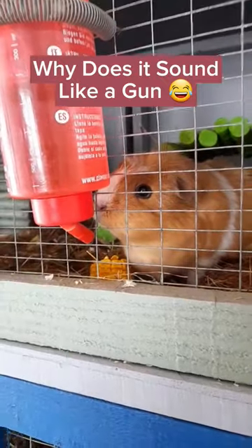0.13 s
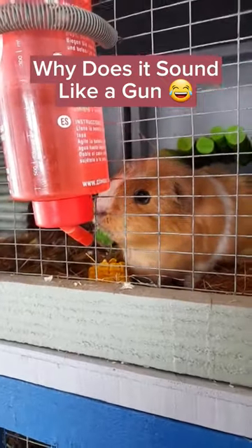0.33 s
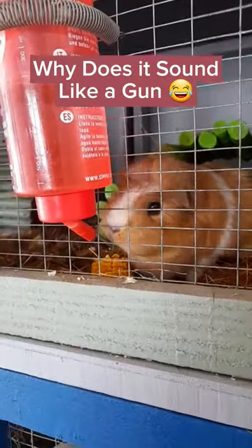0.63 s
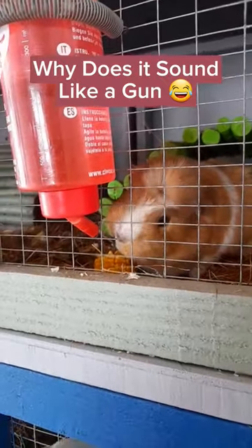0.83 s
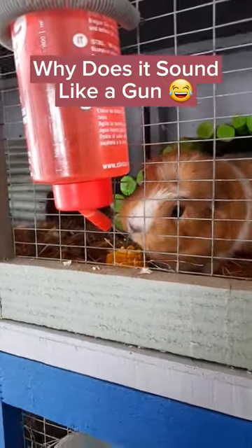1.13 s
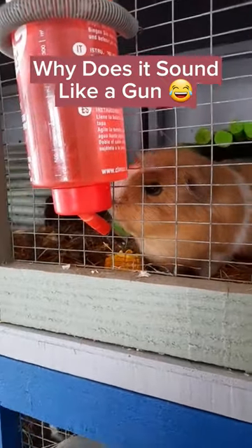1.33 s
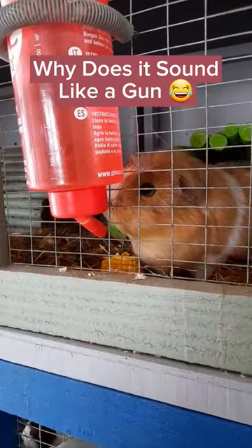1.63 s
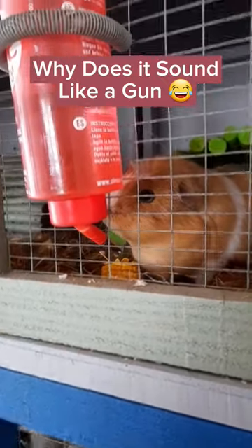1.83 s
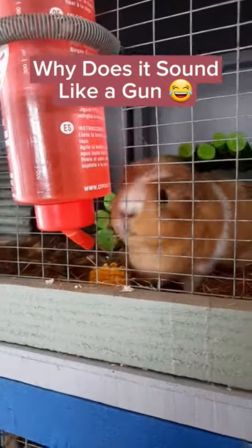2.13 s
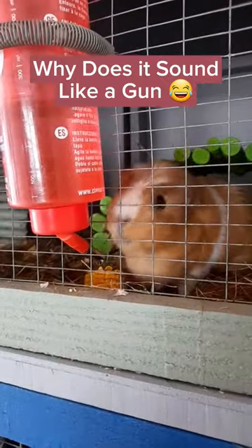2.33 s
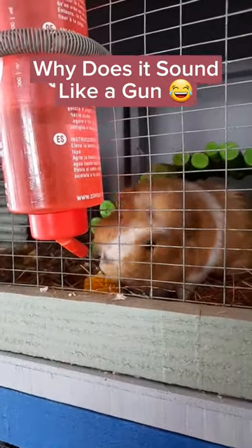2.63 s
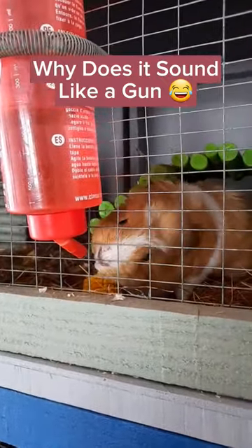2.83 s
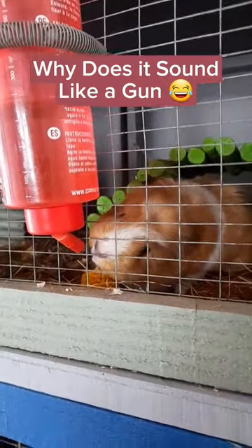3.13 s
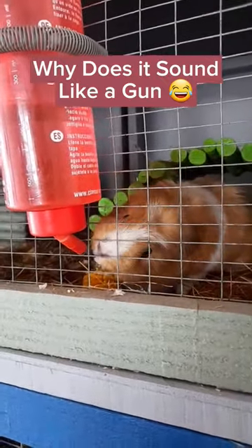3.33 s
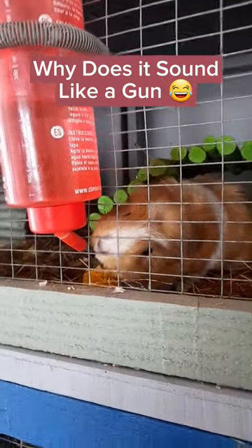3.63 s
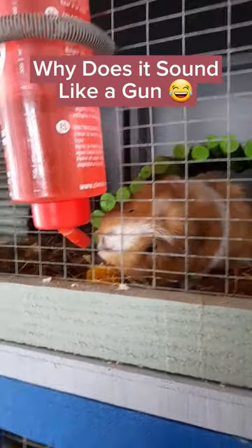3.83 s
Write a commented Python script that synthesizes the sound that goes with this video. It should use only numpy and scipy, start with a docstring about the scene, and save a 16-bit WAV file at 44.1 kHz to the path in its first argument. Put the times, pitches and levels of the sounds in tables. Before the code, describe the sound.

Metal water bottle spout clicks dominate the end. From 0 to 2.8 s there is only low hiss, faint rustle, soft muffled bedding pats, dull handling bumps and two tiny high ticks before 0.3 s. At about 2.9 s hard, bright ball clicks and gritty tooth scrapes begin, clustering near 3.1, 3.2, 3.4, 3.65 and 3.95 s, with short bottle knocks, cage rattle, stronger handling rumble and small-room echo.

```python
"""The metal spout of a water bottle, worked by a guinea pig in a wire cage, close to a hand-held phone.
Bursts of noise excite decaying modes: the ball clicks in quick clusters, teeth scrape in short bursts,
and bottle, tube and cage wire ring briefly, with a small room around them. Before that the animal shuffles
in its bedding: soft puffs of filtered noise over a faint rustle, with two faint, very short high ticks.
Underneath lie noise bands for room hiss and handling rumble, and low tones for bumps of the hand."""
import sys
import numpy as np
from scipy import signal
from scipy.fft import rfft, irfft
from scipy.io import wavfile
from scipy.ndimage import uniform_filter1d, map_coordinates

SR = 44100
rng = np.random.default_rng(int(sys.argv[2]) if len(sys.argv) > 2 else 0)


def generate_wav(sig):
    """Save sig (samples, or channels by samples) to the path in sys.argv[1] as 16-bit PCM at SR."""
    pcm = np.round(np.clip(np.atleast_2d(sig).T, -1, 1) * 32767).astype(np.int16)
    wavfile.write(sys.argv[1], SR, pcm)


N = 176400
T = np.arange(N) / SR
LN_60_DB = np.log(1000)  # a mode falls by this exponent in its t60


def undb(db):
    """Decibels to amplitude."""
    return 10 ** (np.asarray(db) / 20)


def unit(x):
    """Scale to an RMS of 1."""
    return x / np.sqrt(np.mean(x ** 2))


def match_energy(x, energy):
    """Give each channel the stated energy."""
    return x * np.sqrt(energy / np.sum(x ** 2, axis=1, keepdims=True))


def band(x, lo_hz, hi_hz):
    """Band-pass filter."""
    return signal.sosfilt(signal.butter(2, [lo_hz, hi_hz], "bandpass", fs=SR, output="sos"), x)


def swell(peak_s, rise_s, fall_s):
    """Bell-shaped rise to the peak, exponential fall."""
    d = T - peak_s
    return np.where(d < 0, np.exp(-(d / rise_s) ** 2), np.exp(-np.abs(d) / fall_s))


def drift(per_s):
    """Slow chance: random steps smoothed into a wandering curve around 0."""
    hold = int(SR / per_s)
    steps = np.repeat(rng.standard_normal(N // hold + 1), hold)
    return uniform_filter1d(steps, hold)[:N]


def pan(left_minus_right_db):
    """Stereo gains, half of the difference on each side."""
    return undb(np.array([[.5], [-.5]]) * left_minus_right_db)


def pair(like, count=N):
    """Left and right noise that are partly alike (0 separate, 1 identical)."""
    a, b = rng.standard_normal((2, count))
    like = np.clip(like, 0, 1)
    return np.array([a, like * a + np.sqrt(1 - like ** 2) * b])


def pair_spectra(like):
    """Spectra of left and right noise, alike by a share per frequency."""
    a, b = rfft(rng.standard_normal((2, N)))
    return np.array([a, like * a + np.sqrt(np.clip(1 - like ** 2, 0, 1)) * b])


def ring(x, hz, t60):
    """One decaying mode driven by x: a complex one-pole resonator."""
    pole = np.exp(2j * np.pi * hz / SR - LN_60_DB / (t60 * SR))
    return signal.lfilter([1], [1, -pole], x).imag


# hiss colour: f/Hz, relative density/dB
HISS_COLOUR = [(120, -27), (200, -3.5), (491, -5), (579, -11.5), (968, -4.5), (1140, -16.5), (1980, -14),
               (6640, -14), (7680, -19.5), (9580, -13.5), (13800, -12.5), (14900, -10), (16000, -50)]
# hiss stereo balance: f/Hz, left minus right/dB
HISS_PAN = [(60, -3.5), (110, -12), (200, -10.5), (380, -4), (700, 0), (1290, 0), (2380, -1), (4400, -1),
            (8120, -1), (15000, 2)]
# slight swelling of the hiss: t/s, level/dB (only its departure from the mean counts)
HISS_SWELL = [(0.0, -70), (0.04, -70), (0.12, -73.5), (0.24, -68.5), (0.39, -73.5), (1.31, -71),
              (1.42, -66), (1.53, -72.5), (2.26, -70.5), (2.35, -71.5), (2.75, -68.5)]
HISS_DB, HISS_LOW_CUT_HZ = -61, 180
HISS_LIKENESS, HISS_ALIKE_HZ = 0.067, 452  # least likeness of the sides, and where likeness falls halfway to it


def hiss():
    """Room and microphone hiss: coloured noise, more alike in both sides at low frequencies."""
    hz = np.arange(N // 2 + 1) * SR / N

    def curve(table):
        f, db = np.array(table).T
        return np.interp(np.log(hz + 1), np.log(f + 1), db)

    like = HISS_LIKENESS + (1 - HISS_LIKENESS) / (1 + ((hz + 1) / HISS_ALIKE_HZ) ** 2)
    colour = undb(curve(HISS_COLOUR)) * pan(curve(HISS_PAN)) * (hz + 1 > HISS_LOW_CUT_HZ)
    noise = irfft(pair_spectra(like) * colour, N)
    t, db = np.array(HISS_SWELL).T
    return undb(HISS_DB + np.interp(T, t, db - db.mean())) * unit(noise)


# handling rumble before panning: t/s, deep level/dB, upper level/dB
RUMBLE = [(0.0, -48, -59), (0.05, -66, -63.5), (0.38, -59, -66), (0.47, -61, -52.5), (0.59, -53, -57.5),
          (0.67, -71, -64), (1.01, -57.5, -64.5), (1.05, -54.5, -63), (1.68, -71, -62.5),
          (1.73, -56, -61.5), (2.17, -64.5, -66), (2.61, -60, -56.5), (2.782, -58.5, -65.5),
          (2.92, -45, -59), (3.01, -57, -52), (3.04, -48, -46), (3.11, -46, -43.5), (3.23, -59, -46.5),
          (3.35, -41.5, -57.5), (3.52, -62, -50), (3.58, -48, -58.5), (3.7, -62, -60), (3.74, -54, -51),
          (3.84, -51.5, -58), (4.0, -50, -49)]


def rumble():
    """The hand on the phone: two low noise bands, the deep one nearly the same in both ports."""
    t, deep_db, upper_db = np.array(RUMBLE).T
    deep = unit(band(band(pair(0.98), 40.5, 107), 33.3, 67.6))
    upper = unit(band(pair(0.45), 50.0, 201.0))
    return pan(-4.5) * (undb(np.interp(T, t, deep_db)) * deep + undb(np.interp(T, t, upper_db)) * upper)


# dull bumps of the hand on the phone: t/s, level/dB before panning, f/Hz, fall/s
BUMPS = [(0.454, -45.5, 190, 0.036), (0.511, -44, 56, 0.034), (0.572, -43.5, 54.3, 0.03),
         (1.24, -43.5, 50.3, 0.019), (3.037, -29.5, 102, 0.017), (3.083, -33, 65, 0.014),
         (3.114, -29, 61.6, 0.017), (3.24, -38.5, 109, 0.032), (3.329, -63, 55, 0.064),
         (3.899, -38, 111, .04)]
BUMP_RISE_S = 0.0063


def bumps():
    """Short low sine tones that swell and die."""
    out = 0
    for s, db, hz, fall_s in BUMPS:
        shape = swell(s + BUMP_RISE_S, BUMP_RISE_S, fall_s)
        out = out + undb(db) * shape * np.sin(2 * np.pi * hz * (T - s))
    return pan(-1.7) * out


BEDDING_PAN_DB = -7.5  # left minus right
RUSTLE_DB, RUSTLE_SWAY_DB, RUSTLE_PER_S = -78.5, 5, 30


def rustle():
    """A faint lumpy rustle of bedding: neighbouring noise bands that come and go at random."""
    out = 0
    for hz in (443, 636, 808, 1050, 1340):
        sway = undb(RUSTLE_DB + RUSTLE_SWAY_DB * drift(RUSTLE_PER_S))
        out = out + sway * unit(band(pair(0.46), hz / 1.2, hz * 1.205))
    return pan(BEDDING_PAN_DB) * out


# soft shuffles in the bedding: t/s, relative level/dB, f/Hz
SHUFFLES = [(0.245, -50.5, 816), (0.229, -49.5, 970), (0.434, -57, 345), (0.473, -53.5, 668),
            (0.51, -52, 472), (0.569, -53, 420), (0.588, -53, 1020), (0.671, -50.5, 950),
            (0.798, -59.5, 392), (0.844, -57, 1010), (1.389, -67, 430), (1.415, -63, 487),
            (1.609, -53, 936), (1.728, -53, 482), (1.907, -56, 477), (1.931, -51, 442), (2.152, -52, 444),
            (2.171, -48.5, 1040), (2.203, -56.5, 1190), (2.395, -52, 450), (2.419, -49, 458),
            (2.513, -59, 790), (2.6, -48, 427), (2.685, -42.5, 503), (2.705, -48, 396), (2.624, -57, 945),
            (0.3182, -58, 1760), (0.511, -53.5, 1280), (0.8196, -56, 1680), (1.2022, -55, 1670),
            (1.2725, -55.5, 1200), (1.4094, -62, 1250), (1.7554, -57, 1410), (1.94, -54, 1720),
            (2.028, -55.5, 1440), (2.437, -50, 1270), (2.5122, -53.5, 1245), (2.7496, -56, 1284)]
SHUFFLE_RISE_S, SHUFFLE_FALL_S, SHUFFLE_DB = 0.0033, 0.021, -8
SHUFFLE_PARTS = ((0.065, 0), (1, -7))  # pitched puff and broad rustle: band spread as a share of f, level/dB


def shuffles():
    """Short muffled pats, each a puff of noise around its own pitch with a broader rustle."""
    out = 0
    for s, db, hz in SHUFFLES:
        shape = swell(s + SHUFFLE_RISE_S, SHUFFLE_RISE_S, SHUFFLE_FALL_S)
        for spread, part_db in SHUFFLE_PARTS:
            puff = shape * band(pair(0.53), hz / (1 + spread), hz * (1 + spread))
            out = out + undb(db + SHUFFLE_DB + part_db) * match_energy(puff, np.sum(shape ** 2))
    return pan(BEDDING_PAN_DB) * out


# faint, very short high ticks: t/s, level/dB before panning, f/Hz, left minus right/dB
PIPS = [(0.0273, -45, 9960, 16), (0.2848, -52, 11500, 7)]
PIP_FALL_S = .0012


def pips():
    """Faint, very short high ticks: sines that start at once and die fast."""
    out = 0
    for s, db, hz, pan_db in PIPS:
        decay = (T > s) * np.exp(-np.abs(T - s) / PIP_FALL_S)
        out = out + pan(pan_db) * undb(db) * decay * np.sin(2 * np.pi * hz * (T - s))
    return out


ROOM_T60_S, ROOM_DB, ROOM_DULL_HZ = 0.19, -7.5, 7850


def room(x):
    """A small room: a dull, decaying cloud of echoes, different in each port."""
    t = T[:SR // 2]
    tail = rng.standard_normal((2, len(t))) * np.exp(-LN_60_DB * t / ROOM_T60_S)
    tail = signal.lfilter(*signal.butter(1, ROOM_DULL_HZ, fs=SR), tail)
    tail = tail / np.sqrt(np.sum(tail ** 2) / 2)
    return undb(ROOM_DB) * signal.fftconvolve(x, tail, axes=1)[:, :N]


# scrapes of teeth on the spout: peak t/s, rise/s, fall/s, relative level/dB,
# low knock against that level/dB, treble tick against that level/dB
SCRAPES = [(2.8, 0.012, 0.031, -49, -48, -12), (2.848, 0.011, 0.087, -49, -41, -12),
           (2.908, 0.019, 0.02, -32, -6, -9.5), (3.017, 0.019, 0.1, -45.5, -8.5, -10),
           (3.149, 0.016, 0.012, -52, -8, -5), (3.183, 0.011, 0.016, -28.5, 0.5, -13),
           (3.282, 0.059, 0.068, -44.5, 2.5, -17), (3.438, 0.012, 0.022, -27.5, -3.5, -9),
           (3.499, 0.0097, 0.022, -56.5, 11.5, -33), (3.544, 0.014, 0.048, -42.5, 0, -16),
           (3.699, 0.012, 0.024, -26, -6.5, -8), (3.792, 0.012, 0.069, -40.5, 0.5, -18.5),
           (3.953, 0.022, 0.035, -31.5, -6, -13.5)]
SLIPS_PER_S, SLIP_SCATTER_DB = 2500, 4
SLIP_GAPS_DB, SLIP_GAPS_PER_S = 3.5, 180  # slow unevenness of the slips
COLOUR_DRIFT_DB, COLOUR_DRIFT_PER_S = 2.5, 60  # each mode's drive wanders
SCRAPE_COLOUR_DB, SCRAPE_DETUNE, SCRAPE_DAMP = 2, .03, .3  # damp: share of a mode's free t60
SCRAPE_LEAD, SCRAPE_SPAN = 4096, 16384  # samples before the peak, samples in all


def scrapes(modes, column, like, late_s):
    """Uneven slips ring all modes at once; each scrape grips elsewhere, so tuning and strengths change."""
    out = np.zeros((2, N + SCRAPE_SPAN))
    size_db = SLIP_SCATTER_DB * rng.standard_normal(N) + SLIP_GAPS_DB * drift(SLIP_GAPS_PER_S)
    slips = (rng.random(N) < SLIPS_PER_S / SR) * undb(size_db)
    grains = unit(slips * pair(like))
    sways = [undb(COLOUR_DRIFT_DB * drift(COLOUR_DRIFT_PER_S)) for _ in modes]
    for row in SCRAPES:
        peak_s, rise_s, fall_s, db = row[:4]
        part_db = row[3 + column] if column else 0
        push = undb(db + part_db) * swell(peak_s + late_s, rise_s, fall_s)
        at = int(peak_s * SR) - SCRAPE_LEAD
        span = slice(at, at + SCRAPE_SPAN)
        force = match_energy((push * grains)[:, span], np.sum(push ** 2))
        end = at + force.shape[1]
        chance = rng.standard_normal((len(modes), 3))
        for (hz, mode_db, t60), sway, (colour, detune, sign) in zip(modes, sways, chance):
            damped_t60 = t60 * SCRAPE_DAMP
            even = np.sqrt(4 * LN_60_DB / (damped_t60 * SR))  # evens out long and short rings
            size = np.sign(sign) * undb(mode_db + SCRAPE_COLOUR_DB * colour) * even
            out[:, at:end] += size * ring(force * sway[span], hz * (1 + SCRAPE_DETUNE * detune), damped_t60)
    return out[:, :N]


# low modes of the cage: f/Hz, relative level/dB, free t60/s (SCRAPE_DAMP shortens it)
CAGE = [(232, -14, 0.047), (316, -3.5, 0.11), (377, -1.5, 0.12), (472, 0.5, 0.11), (590, -7, 0.013)]
CAGE_DB, CAGE_LATE_S, CAGE_PAN_DB = -10.5, 0.024, 1


def cage():
    """The shaken cage rumbles a little after each scrape."""
    return undb(CAGE_DB) * pan(CAGE_PAN_DB) * scrapes(CAGE, column=1, like=1.0, late_s=CAGE_LATE_S)


# sharp clicks of the ball and teeth: t/s, relative level/dB,
# low knock against that level/dB, treble tick against that level/dB
CLICKS = [(2.8954, -24.5, -27, 1.5), (2.9085, -24, -37, 2.5), (2.9144, -34, 3, 9),
          (3.0727, -14.5, -23, -27), (3.077, -31.5, -13, 9.5), (3.09, -36.5, -4, 12.5),
          (3.1138, -24.5, -11.5, 1.5), (3.1785, -18.5, -29, -4), (3.1865, -29, 5, 15.5),
          (3.1979, -19.5, -5, 3), (3.2085, -36.5, 9, 0), (3.3523, -14.5, -11, -25),
          (3.357, -13, -10.5, -12.5), (3.361, -35, -9, 5), (3.3942, -21, -4, -1), (3.4376, -20, -23, 1),
          (3.4424, -27, -20, 1), (3.4479, -20.5, -2.5, 3), (3.624, -14, -25, -30),
          (3.6255, -14.5, -10, -17), (3.6287, -19, -7.5, -6), (3.6464, -15.5, -8.5, 3.5),
          (3.7087, -21.5, -8, 2), (3.7113, -18, -7.5, -13), (3.7275, -23.5, 6, -14), (3.7732, -50, 7, -20),
          (3.896, -23.5, -2, 1), (3.9468, -26, -26, 1), (3.9558, -21.5, -6, 3.5), (3.9773, -26.5, 6, -3)]
HIT_SCATTER_DB, DETUNE, CLICK_LOW_HZ = 3.5, .02, 523
RING_DAMP, CRACK_DAMP, CRACK_DB = .33, .12, -3  # shares of a mode's free t60; the crack dies sooner
CONTACT_S, CHATTER_TAIL_S, CHATTER_TAIL_DB, CHATTER_SCATTER_DB = 0.00038, 0.005, -11.5, 3.5


def clicks(modes, column, like):
    """Every click is a brief chatter that rings the modes with its own strengths and tuning."""
    out = np.zeros((2, N))
    t = T[:4096]
    hz, db, t60 = np.array(modes).T[:, :, None]
    energy = np.sum(undb(db) ** 2 * t60) * SR / (4 * LN_60_DB)
    decay = np.exp(-LN_60_DB * t / (t60 * RING_DAMP))
    decay = decay + undb(CRACK_DB) * np.exp(-LN_60_DB * t / (t60 * CRACK_DAMP))
    contact = np.exp(-t / CONTACT_S) + undb(CHATTER_TAIL_DB) * np.exp(-t / CHATTER_TAIL_S)
    for row in CLICKS:
        detune, shared, left, right, sign = rng.standard_normal((5, len(modes), 1))
        rings = np.sign(sign) * np.sin(2 * np.pi * hz * (1 + DETUNE * detune) * t) * decay
        sides = []
        for own in (left, right):
            scatter_db = HIT_SCATTER_DB * (like * shared + (1 - like) * own)
            sides.append(np.sum(undb(db + scatter_db) * rings, axis=0))
        roughness = undb(CHATTER_SCATTER_DB * rng.standard_normal(len(t)))
        chatter = pair(like, count=len(t)) * roughness * contact
        blow = signal.fftconvolve(np.array(sides), chatter, axes=1)[:, :len(t)]
        blow = match_energy(blow, energy)
        part_db = row[1 + column] if column else 0
        at = int(row[0] * SR)
        out[:, at:at + len(t)] += undb(row[1] + part_db) * blow[:, :min(len(t), N - at)]
    return signal.sosfilt(signal.butter(3, CLICK_LOW_HZ, "highpass", fs=SR, output="sos"), out)


def strike(modes, column, like):
    """Clicks and scrapes on one set of modes (column 0 plain level, 1 adds the knock's, 2 the tick's)."""
    return clicks(modes, column, like) + scrapes(modes, column, like, late_s=0)


# modes of bottle, tube and ball: f/Hz, relative level/dB, free t60/s (clicks and scrapes shorten it)
KNOCK = [(680, -20, 0.076), (740, -3.5, 0.071), (815, -1.5, 0.033), (874, -2.5, 0.017), (1140, -2.5, 0.008)]
TUBE = [(1350, -22, 0.013), (1790, -1.5, 0.039), (2070, -9, 0.015), (2463, 2, 0.02), (2940, -16, 0.009),
        (3195, -3.5, 0.063), (3520, -6, 0.063), (3824, -7, 0.033), (4194, -4, 0.049), (4484, -4, 0.044),
        (5000, -6, 0.022), (5750, -10, 0.031), (6360, -14, 0.041), (7070, -13.5, 0.029)]
TICK = [(8000, -12, 0.0051), (9400, -20, 0.0027), (10150, -6.5, 0.003), (11750, -8.5, 0.039),
        (12400, -7, 0.0023), (13070, -5.5, 0.0074), (13400, -10.5, 0.01), (14200, -8, 0.0046),
        (15000, -12, 0.0018)]
KNOCK_DB, KNOCK_PAN_DB, KNOCK_LIKE = -2, 0, 0.78
TUBE_DB, TUBE_PAN_DB, TUBE_LIKE = -7, -0.5, 0.55
TICK_DB, TICK_PAN_DB, TICK_LIKE = 4, 6.5, 0.32
PORT_LAG_S = 0.000295


def spout():
    """Low knock of the bottle, ring of the tube, bright tick of the ball; the right port hears them later."""
    knock = undb(KNOCK_DB) * pan(KNOCK_PAN_DB) * strike(KNOCK, column=1, like=KNOCK_LIKE)
    tube = undb(TUBE_DB) * pan(TUBE_PAN_DB) * strike(TUBE, column=0, like=TUBE_LIKE)
    tick = undb(TICK_DB) * pan(TICK_PAN_DB) * strike(TICK, column=2, like=TICK_LIKE)
    left, right = knock + tube + tick
    return np.array([left, map_coordinates(right, [(T - PORT_LAG_S) * SR], order=3)])


def scene():
    """Spout and cage with their room, over bedding, high ticks, handling and hiss."""
    near = spout() + cage()
    bedding = shuffles() + rustle()
    handling = rumble() + bumps()
    return near + room(near) + bedding + pips() + handling + hiss()


TOP_HZ = 15900


def record(dry):
    """The phone cuts the top with a steep low-pass."""
    return signal.sosfilt(signal.ellip(8, .5, 70, TOP_HZ, fs=SR, output="sos"), dry)


dry = scene()
out = record(dry)
generate_wav(out)
```